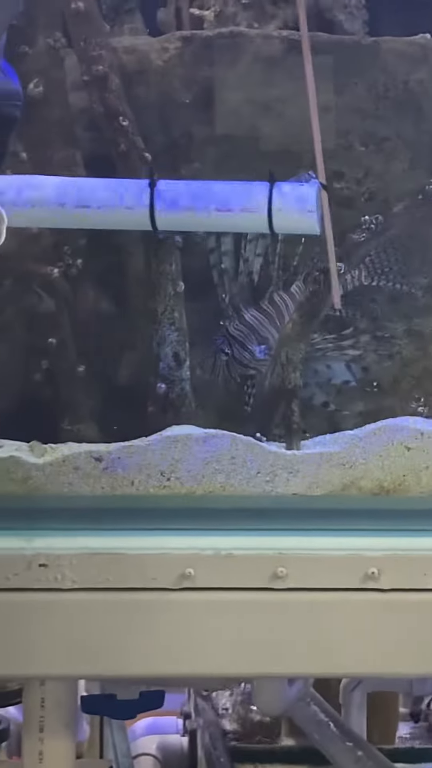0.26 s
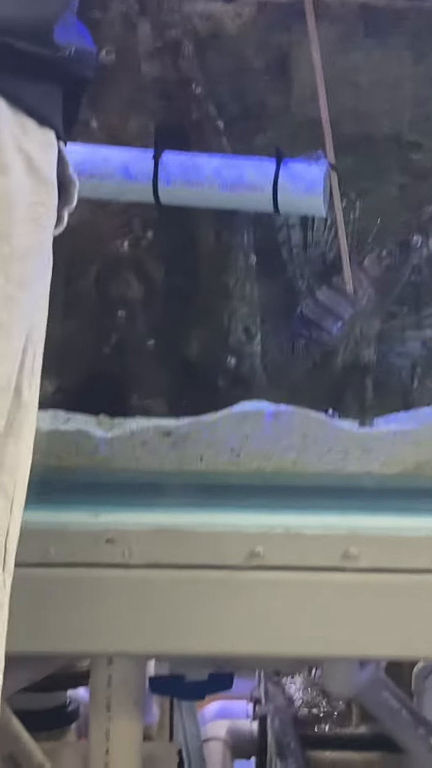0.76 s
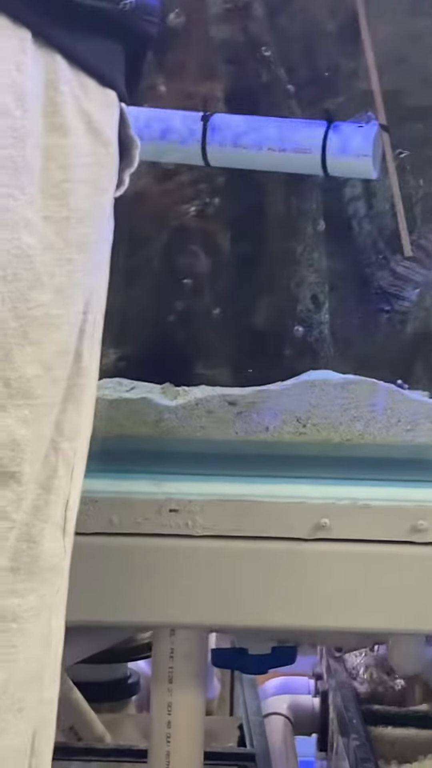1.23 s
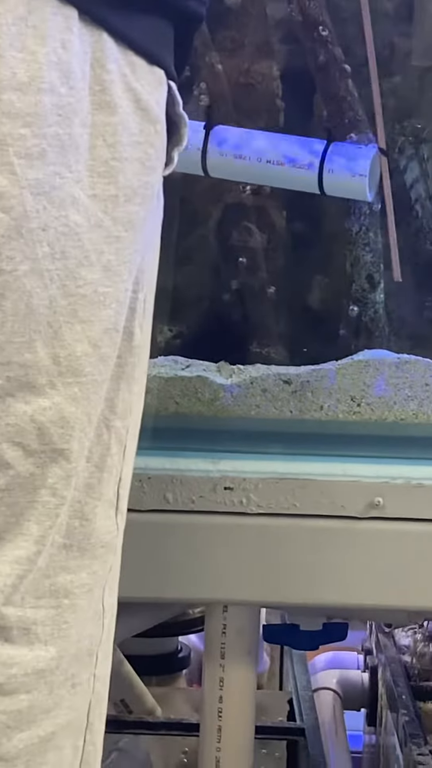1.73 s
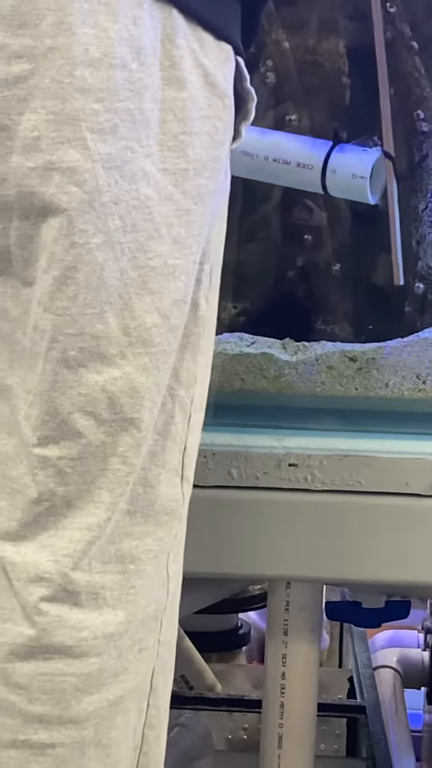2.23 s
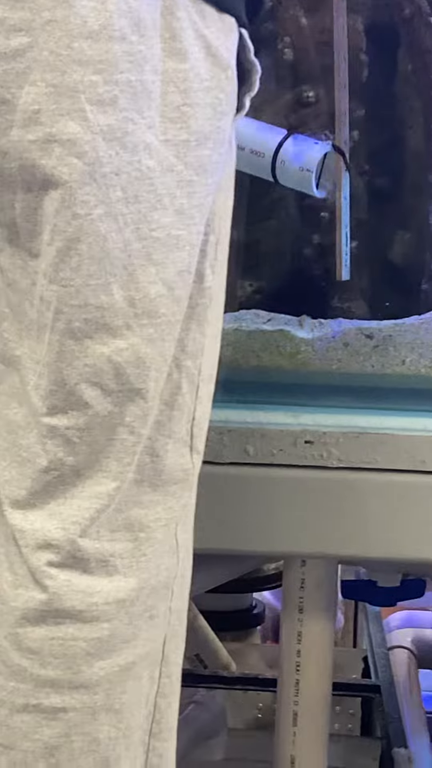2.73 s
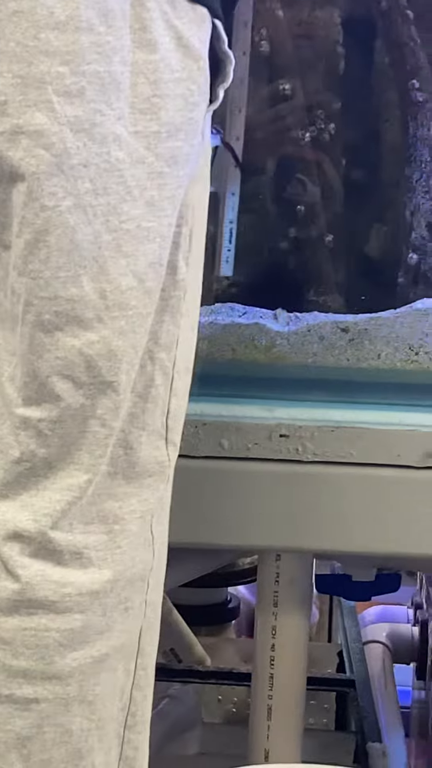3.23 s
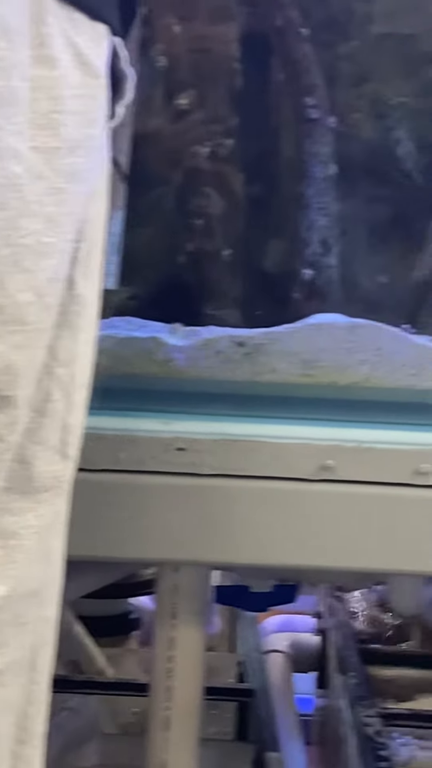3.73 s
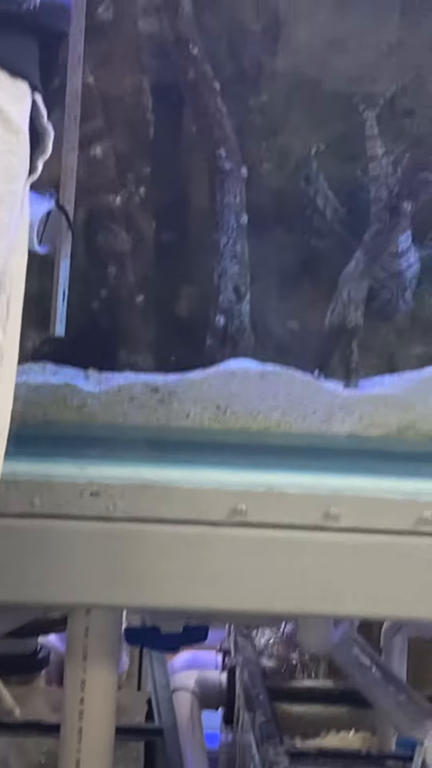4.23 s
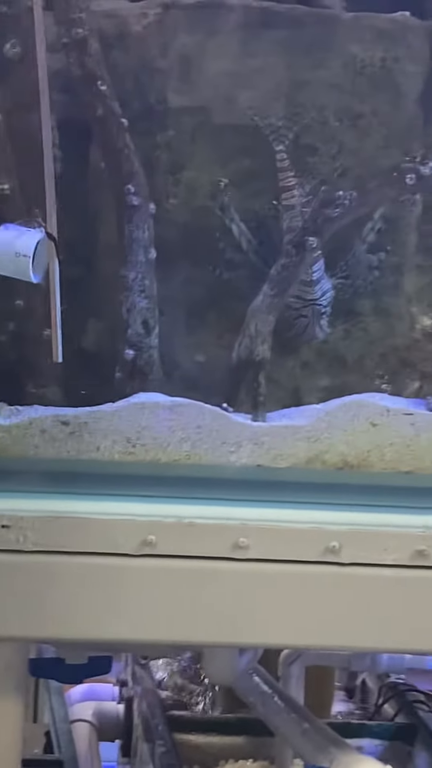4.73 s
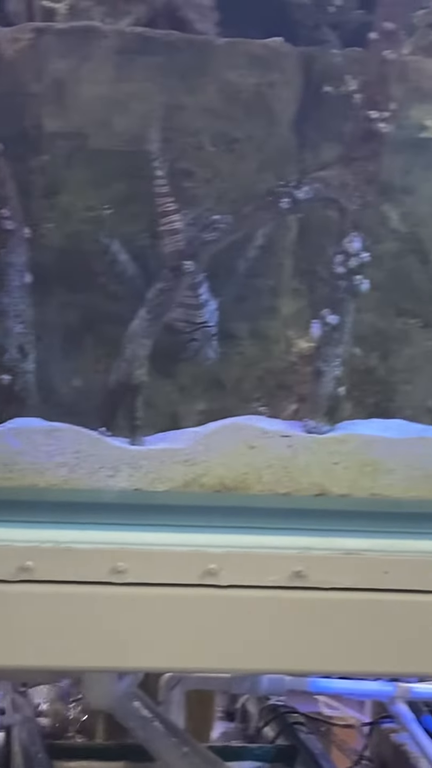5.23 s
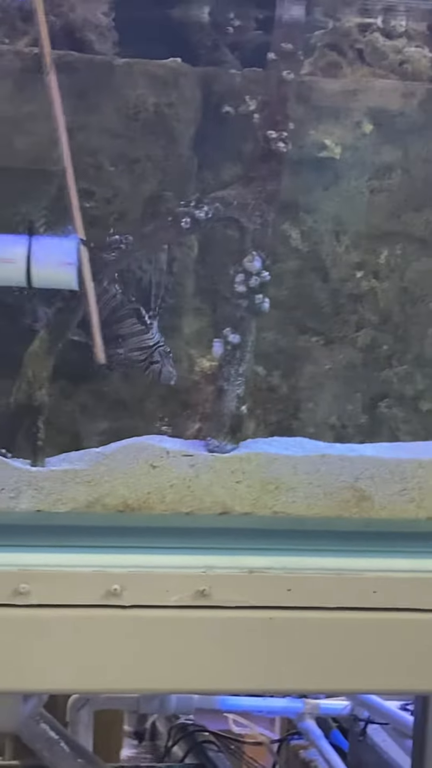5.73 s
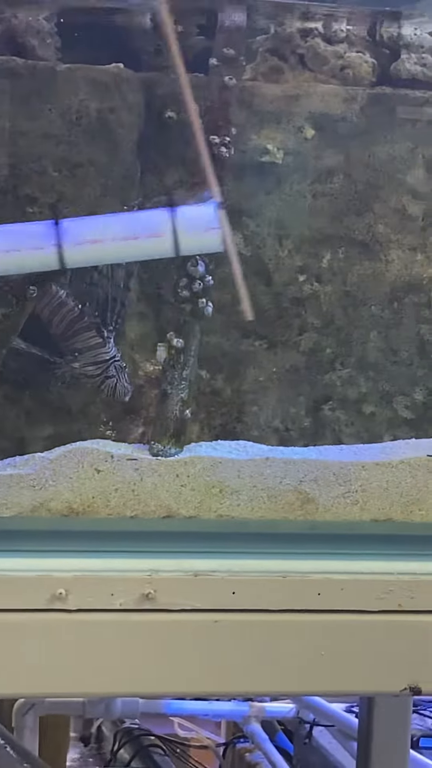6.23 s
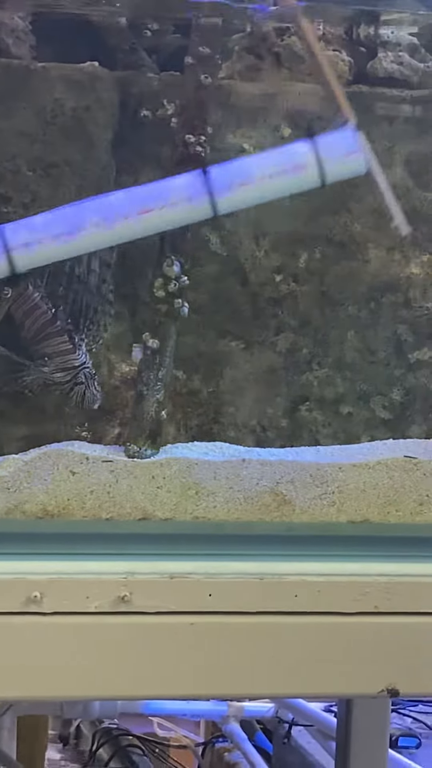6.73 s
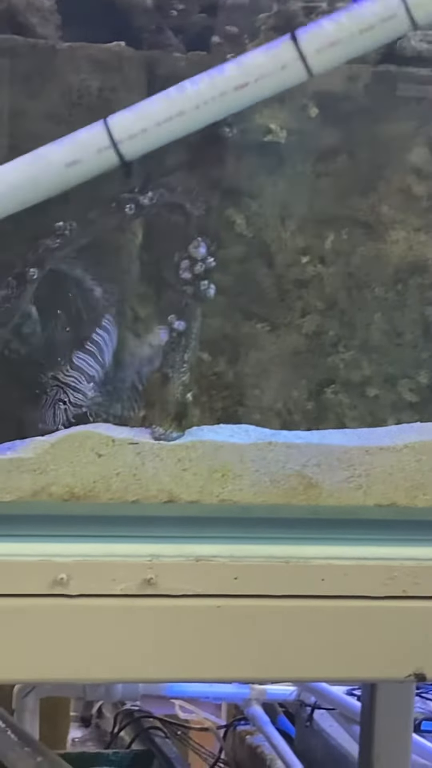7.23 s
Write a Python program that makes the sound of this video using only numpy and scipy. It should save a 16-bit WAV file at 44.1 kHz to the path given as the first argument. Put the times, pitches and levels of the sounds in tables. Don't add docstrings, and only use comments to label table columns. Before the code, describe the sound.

A continuous machine-room bed picked up by a moving hand-held stereo phone: deep mains hum slightly heavier on the right, slow pump throb, hollow pipe rumble, broad smooth water hiss and faint scattered bubbles. It begins briefly muffled, then clears. A high whine wavers throughout; just after four seconds, some hum and whine tones brighten as a nearby body no longer shades the left side. No distinct knocks or splashes.

```python
import sys
import numpy as np
from scipy import signal
from scipy.fft import rfft, irfft, next_fast_len
from scipy.io import wavfile
from scipy.ndimage import uniform_filter1d, map_coordinates

SR = 44100
rng = np.random.default_rng(int(sys.argv[2]) if len(sys.argv) > 2 else 0)


def attenuation_scalar(level_db):
    decades = np.asarray(level_db, float) / 20
    return 10 ** decades


def to_wav(sig):
    pcm = np.clip(np.atleast_2d(sig), -1, 1) * 32767
    pcm = np.round(pcm).astype(np.int16)
    wavfile.write(sys.argv[1], SR, pcm.T)


N = 328986
TIME = np.arange(N) / SR
MAINS_HZ, PUMP_HZ, SMALL_PUMP_HZ = 60.02, 29.245, 27.75


def unit(x):
    return x / np.sqrt(np.mean(x ** 2) + 1e-20)


def along(points, hz):
    f, value = np.transpose(points)
    return np.interp(np.log(hz + 1), np.log(f + 1), value)


def wobble(rate):
    knots = rng.standard_normal(int(N * rate / SR) + 4)
    return map_coordinates(knots, [np.arange(N) * rate / SR])


def bumps(rows):
    return sum(height * np.exp(-((TIME - s) / half) ** 2) for s, half, height in rows)


def filtered(x, response):
    size = next_fast_len(N + SR // 2)
    return irfft(rfft(x, size) * response(np.fft.rfftfreq(size, 1 / SR)), size)[..., :N]


def tone(hz, left_db, right_db, lead):
    phase = 2 * np.pi * (hz * TIME + rng.random())
    left = attenuation_scalar(left_db) * np.sin(phase)
    right = attenuation_scalar(right_db) * np.sin(phase + lead)
    return np.sqrt(2) * np.array([left, right])


def motor(base_hz, orders, sway_db):
    total = np.zeros((2, N))
    for order, left_db, right_db, lead in orders:
        hz = order * base_hz
        depth_db = sway_db * min(hz / 600, 1) ** 2
        sway = attenuation_scalar(depth_db * np.array([wobble(1), wobble(1)]))
        total += sway * tone(hz, left_db, right_db, lead)
    return total


# [multiple of mains, left level/dB, right level/dB, right lead/rad]
HUM = [(1, -55, -50.5, .1), (2, -39.5, -35.5, .1), (3, -65, -63, -.3), (4, -53, -54, -.1),
       (5, -63, -60.5, -.2), (6, -56, -57, .2), (8, -63.5, -60.5, .3), (9, -69.5, -66, -.1),
       (10, -64, -71, -.8), (13, -65, -64, -.4), (14, -62.5, -62, -.8), (17, -71, -66, .4),
       (28, -72, -72, 0), (29, -70, -65, -.8), (33, -71, -71, 1), (34, -73, -73, 1), (35, -71, -71, 1.5),
       (36, -72, -72, 1), (37, -69, -69, 1), (53, -71, -71, 2), (138, -71, -71, 0)]


def mains_hum():
    return motor(MAINS_HZ, HUM, sway_db=2.5)


def clearing():
    clear_at_s, clear_takes_s = 4.3, .15
    return .5 + .5 * np.tanh((TIME - clear_at_s) / clear_takes_s)


def shaded(partial, lead):
    hz, left, right, clear_left, clear_right = partial
    left_db = left + clearing() * (clear_left - left)
    right_db = right + clearing() * (clear_right - right)
    return tone(hz, left_db, right_db, lead)


# [f/Hz, shaded left level/dB, shaded right level/dB, clear left level/dB, clear right level/dB]
TWELFTH = (12 * MAINS_HZ, -64, -54, -58, -51)
SIXTEENTH = (16 * MAINS_HZ, -56, -59, -59, -61)


def shaded_hum():
    return shaded(TWELFTH, -.2) + shaded(SIXTEENTH, -.4)


# [order of the shaft, left level/dB, right level/dB, right lead/rad]
PUMP = [(1, -56.5, -53.5, 0), (2, -60, -55.5, .2), (4.015, -58.5, -53.5, 0), (24, -58.5, -55, -.2),
        (72, -67.5, -66, 1.5), (96, -68, -70, 1.9)]
SMALL_PUMP = [(1, -64.5, -61.5, 0), (2, -64, -59.5, .1)]


def pump_shafts():
    return motor(PUMP_HZ, PUMP, sway_db=1.5) + motor(SMALL_PUMP_HZ, SMALL_PUMP, sway_db=1.5)


# [f/Hz, shaded left level/dB, shaded right level/dB, clear left level/dB, clear right level/dB]
ORDER_48 = (48 * PUMP_HZ, -63, -57.5, -56, -52.5)
# [t/s, half length/s, lead lost/rad]
SWINGS = [(.45, .25, .85), (.95, .35, -.2), (4.3, .2, .95), (7.1, .5, .3)]
# [t/s, half length/s, depth/dB]
NODES_90 = [
    (.08, .22, 20),
    (1.1, .4, 1.5),
    (6.25, .5, 8),
]
NODES_180 = [(.8, .55, 12), (4.1, .4, 11), (5.6, .3, 14), (6.9, .9, 9)]


def whine():
    main_db = -50 - bumps(NODES_90)
    octave_db = -61 - bumps(NODES_180)
    shaded_lead, clear_lead = 2.15, 2.45
    lead = shaded_lead + clearing() * (clear_lead - shaded_lead) - bumps(SWINGS)
    tip = bumps([(4.45, .2, 1)])
    main = tone(90 * PUMP_HZ, main_db - 5 * tip, main_db + .5 + 3 * tip, lead)
    octave = tone(180 * PUMP_HZ, octave_db, octave_db, np.pi)
    return shaded(ORDER_48, 2.1) + main + octave


def rush(spectrum, alike, ports, patchy_db):
    noise = signal.stft(rng.standard_normal((2, N)), nperseg=512)[2]
    field = rng.standard_normal(noise.shape[1:])
    field = uniform_filter1d(field, size=3, axis=0)
    field = uniform_filter1d(field, size=12, axis=1)
    pair = signal.istft(noise * attenuation_scalar(patchy_db * unit(field)), nperseg=512)[1][:, :N]

    def mid_side(hz):
        angle = np.arccos(np.clip(along(alike, hz), -1, 1)) / 2
        return attenuation_scalar(along(spectrum, hz)) * [np.cos(angle), np.sin(angle)]

    mid, side = filtered(pair, mid_side)
    return unit(filtered(np.array([mid + side, mid - side]), ports))


# [f/Hz, level/dB per Hz]
PIPES = [(20, -18), (38, -27), (46, -3), (75, 0), (130, 0.5), (165, -4.5), (250, -4.5), (330, -6.5),
         (450, -7), (560, -12), (740, -9.5), (1300, -11.5), (2300, -18.5), (4500, -73)]
# [f/Hz, likeness]
PIPES_ALIKE = [(60, 1), (140, 1), (210, .94), (330, 1), (520, 0.4), (800, 0.55), (1200, 0.26), (2500, 0.13)]
# [f/Hz, left - right level/dB]
PIPES_PAN = [(60, -3.5), (150, -5.5), (330, -2), (500, -2.5), (1200, -0.5), (2500, -0.5)]
# [f/Hz, width/Hz, level/dB]
AIR_COLUMNS = [(189, 27, 2), (251, 11, 4), (366, 9.3, 5.5), (620, 14, 7), (734, 18, 5.5), (955, 56, 4)]


def pipe_rumble():
    def pan(hz):
        return attenuation_scalar(along(PIPES_PAN, hz) * [[.5], [-.5]])

    def ring(hz):
        return attenuation_scalar(sum(db / (1 + (2 * (hz - center) / width) ** 2) for center, width, db in AIR_COLUMNS))

    surge_db = .25 * wobble(6)
    return attenuation_scalar(-40.5 + surge_db) * filtered(rush(PIPES, PIPES_ALIKE, pan, patchy_db=1.72), ring)


# [f/Hz, level/dB per Hz]
WATER = [(600, -25), (1500, 2.5), (2500, 1), (3500, 0.5), (4600, -1.5), (6300, 0), (8300, -1.5),
         (11000, -4), (12500, -7.5), (15700, -10)]
# [f/Hz, likeness]
WATER_ALIKE = [(2000, .5), (3800, .45), (4500, .52), (5000, .9), (5600, .96), (7000, .94), (8400, .98),
               (15000, .98)]
# [f/Hz, right lead/rad]
WATER_LEAD = [(1500, 1.2), (2500, 2.2), (3600, 2.9), (4800, 3.25), (5900, 2.8), (7700, .55), (9200, -.55),
              (11780, -3.14), (14700, -6.1), (16000, -7)]


def water_hiss():
    def lead(hz):
        return np.exp(1j * np.interp(hz, *np.transpose(WATER_LEAD)) * [[-.5], [.5]])

    water = attenuation_scalar(-43.5 + 0.46 * wobble(11)) * rush(WATER, WATER_ALIKE, lead, patchy_db=0.97)
    turning = .035 * wobble(2) + .05 * wobble(12)
    quarter = filtered(water, lambda hz: -1j * (hz > 0))
    return np.cos(turning) * water + np.sin(turning) * quarter * [[1], [-1]]


def bubbles(level_db, count):
    when, size, pitch, lead, side = rng.random((count, 5)).T[..., None]
    hz = 700 * 7 ** pitch
    t = np.arange(SR // 25) / SR
    cycles = hz * t
    peak = attenuation_scalar(level_db - 5 * np.log(size + .08) - 9 * pitch)
    shape = peak * cycles / 6 * np.exp(1 - cycles / 6)
    phase = 2 * np.pi * cycles * (1 + .004 * cycles)
    left = attenuation_scalar(4 * (side - .5)) * np.sin(phase)
    right = attenuation_scalar(4 * (.5 - side)) * np.sin(phase + 3 * lead * pitch)
    index = ((when * N).astype(int) + np.arange(len(t))).ravel()
    return np.array([np.bincount(index, (shape * port).ravel(), N)[:N] for port in (left, right)])


def scene():
    machines = mains_hum() + shaded_hum() + pump_shafts() + whine()
    return machines + pipe_rumble() + water_hiss() + bubbles(level_db=-55.5, count=700)


# [f/Hz, level/dB]
OPENING = [(100, -10), (500, -6), (2500, -7.5), (6000, -11), (7950, -14), (8050, 1)]


def noise_filter(dry):
    held = filtered(dry, lambda hz: attenuation_scalar(along(OPENING, hz)))
    opened = np.interp(TIME, [.175, .21], [0, 1])
    return held + opened * (dry - held)


def low_pass(x):
    return signal.sosfilt(signal.butter(12, 16930, fs=SR, output="sos"), x)


def record(dry):
    mix = filtered(noise_filter(dry), lambda hz: hz < 15770)
    return low_pass(mix)


dry = scene()
out = record(dry)
to_wav(out)
```